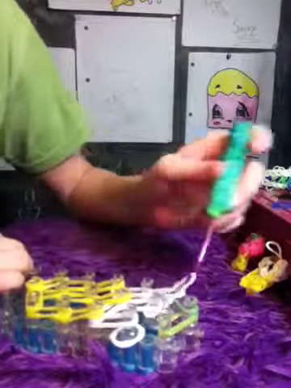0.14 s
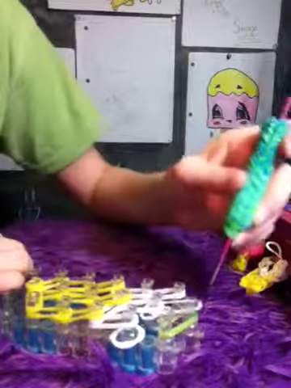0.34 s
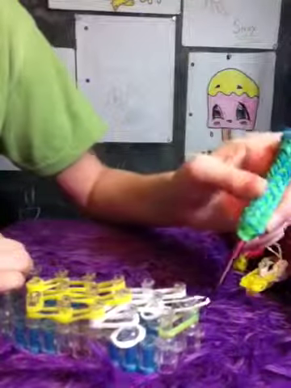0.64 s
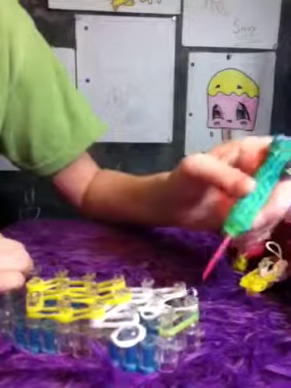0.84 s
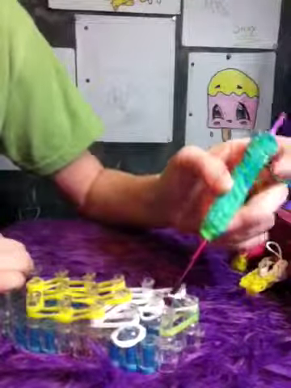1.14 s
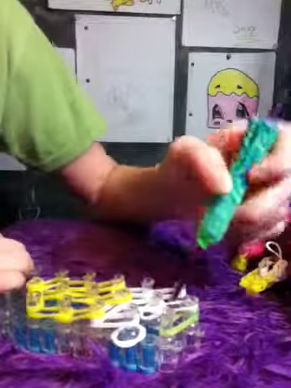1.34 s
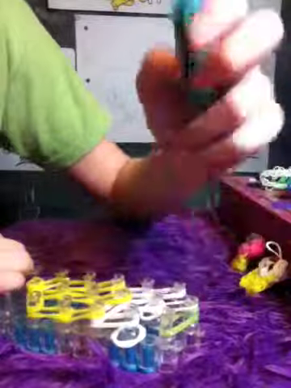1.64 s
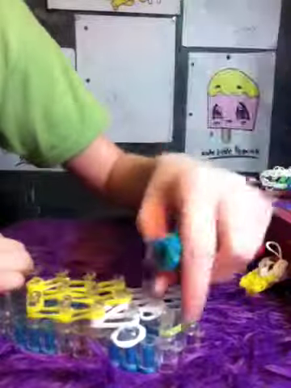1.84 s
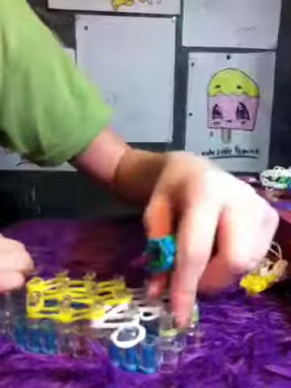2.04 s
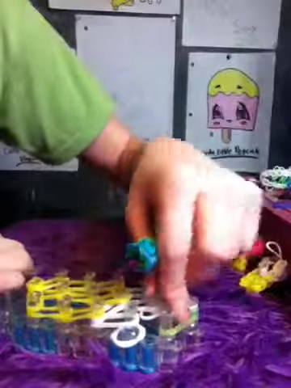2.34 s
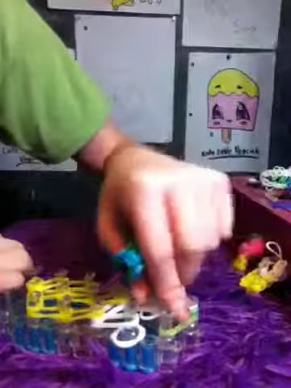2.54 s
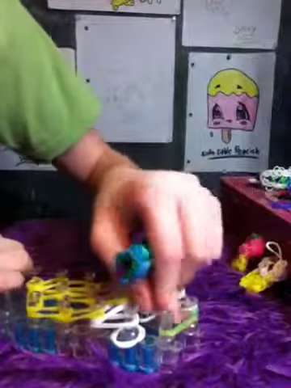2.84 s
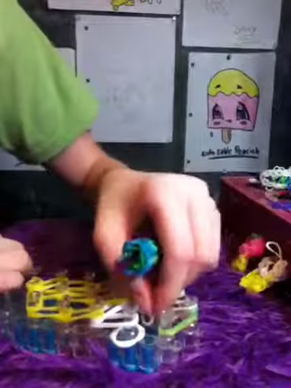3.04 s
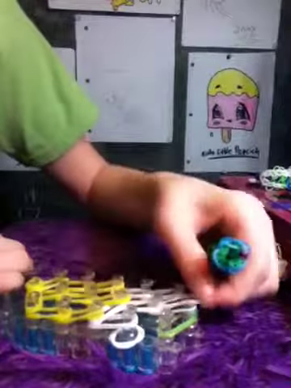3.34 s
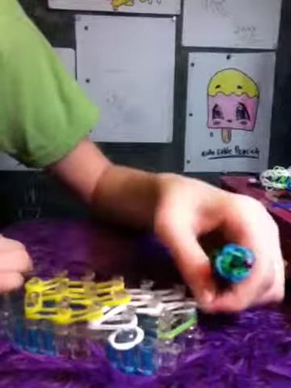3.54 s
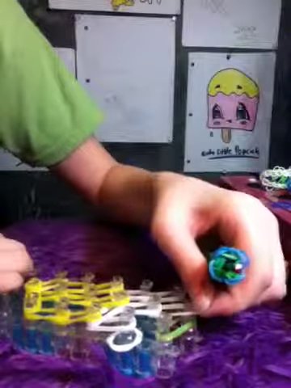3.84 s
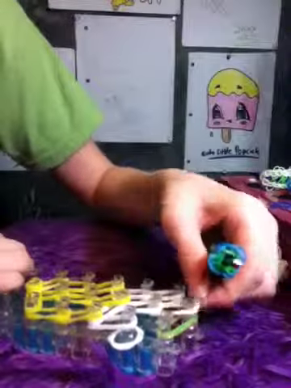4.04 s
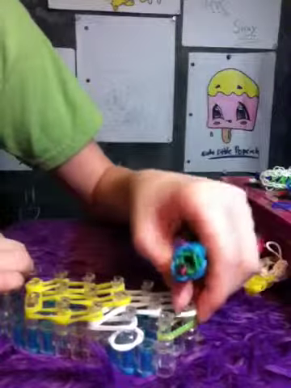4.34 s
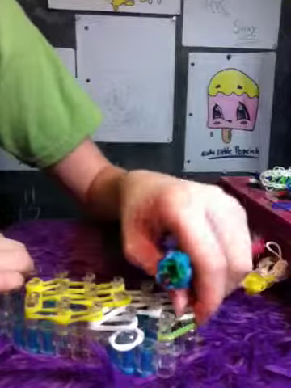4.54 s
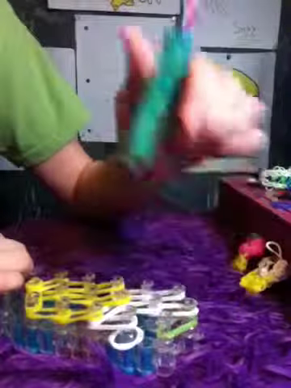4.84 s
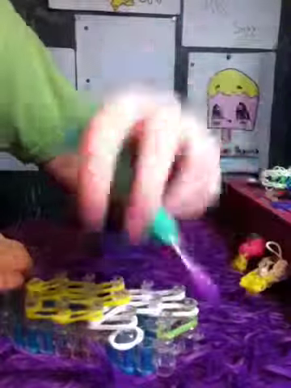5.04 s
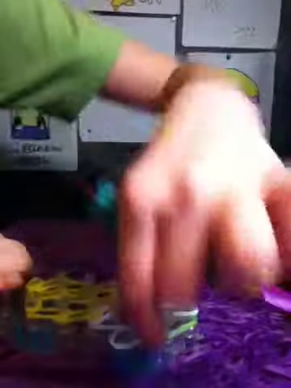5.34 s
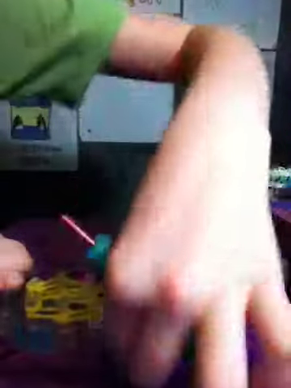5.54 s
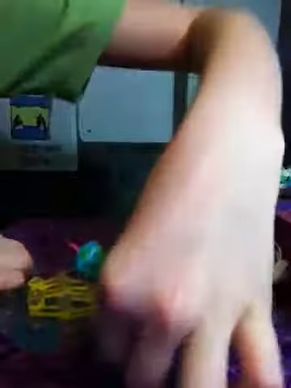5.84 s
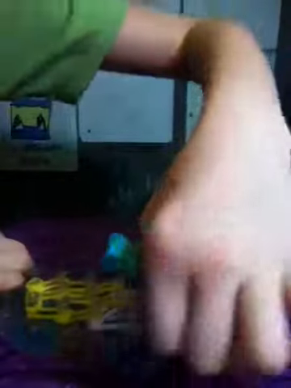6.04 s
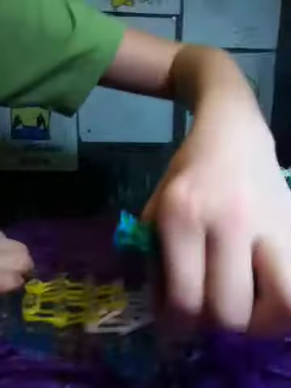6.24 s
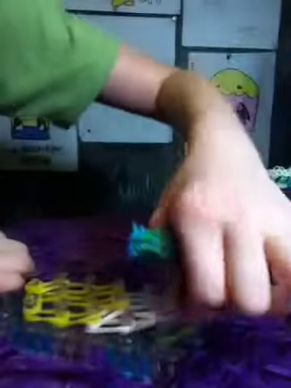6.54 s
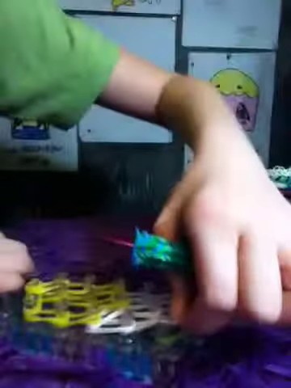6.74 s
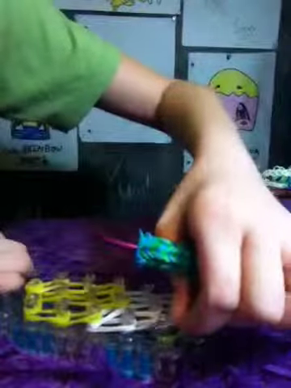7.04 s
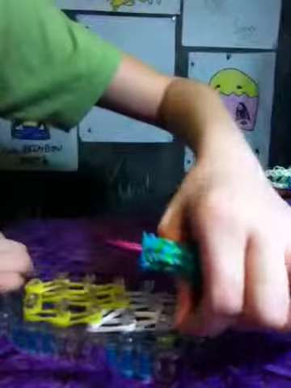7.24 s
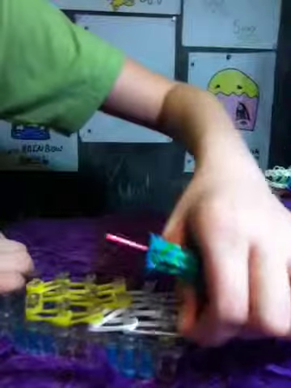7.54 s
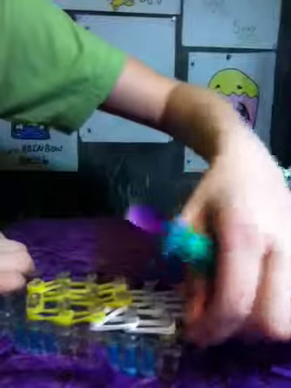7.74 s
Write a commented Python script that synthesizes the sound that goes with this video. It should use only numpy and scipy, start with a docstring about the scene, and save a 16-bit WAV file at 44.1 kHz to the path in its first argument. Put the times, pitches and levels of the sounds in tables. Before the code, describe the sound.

A close microphone in a small dry room picks up rubber bands being hooked over plastic pegs. After a faint rub, isolated clacks come with brief low twangs and soft thumps, separated by quiet fumbling. Past the middle a thin hook clinks brightly, then hollow pops, scrapes and firmer clacks come quicker. Low steady hiss lies underneath throughout.

```python
"""Rubber bands are looped over the pegs of a plastic loom on a furry mat, by plastic hook and fingers, in a small dry room.
Throughout: low steady hiss (shaped noise) and faint stray touches (damped modes).
A soft rub (noisy slips) opens; from 0.7 s bands slip onto pegs with a clack (modes, noise), twang (sine) and thump (modes).
From 5.4 s the hook clinks (bright modes) as it is shifted in the hand; from 6.4 s hollow pops (paired resonances)
and most of the rubs join in. One close microphone."""
import sys
import numpy as np
from scipy import signal
from scipy.fft import rfft, irfft
from scipy.io import wavfile

SR = 44100
rng = np.random.default_rng(int(sys.argv[2]) if len(sys.argv) > 2 else 0)


def transcribe(signal):
    """Save signal, clipped to [-1, 1], as a 16-bit WAV file at the path in sys.argv[1]."""
    frames = np.atleast_2d(signal).T
    limited = np.clip(frames, -1, 1)
    pcm = np.round(limited * 32767).astype(np.int16)
    wavfile.write(sys.argv[1], SR, pcm)


N = 348364
AGE = np.arange(SR // 4) / SR  # time since a blow [s]
HEAD, LONG_HEAD = 660, 1320  # samples over which a blow's level is set: 15 and 30 ms


def undb(db):
    """Decibels to gain."""
    return 10 ** (np.asarray(db) / 20)


def fade(t60_s):
    """Exponential decay that loses 60 dB in t60_s."""
    return np.exp(-np.log(1000) * AGE / t60_s)


def swell(rise_s):
    """Onset of a soft, springy contact."""
    return 1 - np.exp(-AGE / rise_s)


def sine(hz):
    """Steady tone over one blow."""
    return np.sin(2 * np.pi * hz * AGE)


def noise():
    """White noise over one blow."""
    return rng.standard_normal(len(AGE))


def level(x, db, size=None):
    """Scale x so that its first size samples have an rms of db."""
    return x * undb(db) / np.sqrt(np.mean(x[:size] ** 2))


def band(x, lo_hz, hi_hz, order=2):
    """Causal band-pass."""
    sos = signal.butter(order, [lo_hz, hi_hz], "band", fs=SR, output="sos")
    return signal.sosfilt(sos, x)


def add(track, s, sound):
    """Mix a sound into the track at time s."""
    i = int(s * SR)
    track[i:i + len(sound)] += sound[:max(N - i, 0)]


def ring(modes, scatter_db, detune):
    """Damped modes; every point of contact weights and tunes them a little differently."""
    out = np.zeros(len(AGE))
    for hz, db, t60_s in modes:
        weight, tuning = rng.standard_normal(2)
        out += undb(db + scatter_db * weight) * fade(t60_s) * sine(hz * (1 + detune * tuning))
    return out


def chatter(x, size, t60_s):
    """One sharp contact followed by a dying flurry of tiny ones."""
    force = size * noise() ** 3 * fade(t60_s)
    force[0] += 1
    return signal.fftconvolve(force, x)[:len(AGE)]


HISS_DB = -59
# background spectrum: (frequency [Hz], relative density [dB])
HISS_SPECTRUM = [(15, -46), (25, -19), (70, -2), (205, 1), (261, -1), (299, -1.5), (352, -3.5), (414, -4.5),
                 (473, -5.5), (1040, -11.5), (1180, -12), (1930, -14), (4820, -16.5), (14600, -20.5),
                 (15800, -24)]


def hiss():
    """Steady room murmur and microphone hiss: white noise shaped in frequency."""
    hz, db = np.transpose(HISS_SPECTRUM)
    bins_hz = np.maximum(np.fft.rfftfreq(N, 1 / SR), 1)
    gain = undb(np.interp(np.log(bins_hz), np.log(hz), db))
    return level(irfft(rfft(rng.standard_normal(N)) * gain, N), HISS_DB)


ROOM_DB, ROOM_T60_S = -12, 0.15


def room(x):
    """Direct sound and a short, dull tail from the table and the walls."""
    decay = fade(ROOM_T60_S) + 0.83 * fade(0.024)
    tail = band(noise(), 83, 12500, order=1) * decay * swell(0.0015)
    response = undb(ROOM_DB) * tail / np.linalg.norm(tail)
    response[0] += 1
    return signal.fftconvolve(x, response)[:N]


# modes of the loom and its pegs: (nominal frequency [Hz], relative level [dB], undamped-by-hand t60 [s])
LOOM_MODES = [(770, -5.5, 0.075), (916, -4.5, 0.043), (1272, -2, 0.015), (1615, -4, 0.05), (2030, -5, 0.02),
              (2210, -3.5, 0.0035), (2976, -3, .016), (3470, -17, 0.091), (4810, 5.5, 0.031),
              (5470, 7.5, 0.022), (6320, -1, 0.063), (6970, 2, 0.0072), (10630, 7, 0.024)]


def loom(scatter_db, detune):
    """The hard plastic of loom and pegs rings in many modes."""
    return ring(LOOM_MODES, scatter_db, detune)


# the loom rocking on the mat: (nominal frequency [Hz], relative level [dB], t60 [s])
BASE_MODES = [(187.6, -10.5, 0.056), (218, -8.5, 0.056), (308, 6.5, 0.03)]


def base(scatter_db, detune):
    """The whole loom rocks on the mat in a few low modes."""
    return ring(BASE_MODES, scatter_db, detune)


TOUCHES = 24
TOUCH_DB, TOUCH_RANGE_DB = -71.5, 6.5  # softest touch, span up to the firmest
BAND_HZ, BAND_T60_S = 460, 0.082  # mean pitch of a band brushed in passing, its decay
TOUCH_TWANG_DB = 2  # twang against touch, at full force


def handling():
    """Faint stray touches of fingers on rubber and plastic; a firmer touch twangs the band more."""
    out = np.zeros(N)
    for when, force, stretch in rng.random((TOUCHES, 3)):
        s = when * N / SR
        db = TOUCH_DB + TOUCH_RANGE_DB * force
        touch = band(loom(scatter_db=5.5, detune=0.054), 640, 3500)
        touch = touch + 0.5 * base(scatter_db=5, detune=0.13)
        add(out, s, level(touch * swell(0.0012), db, HEAD))
        pitch_hz = BAND_HZ * (1 + 0.2 * (stretch - 0.5))
        twang = sine(pitch_hz) * fade(BAND_T60_S) * swell(0.0053)
        add(out, s, force * level(twang, db + TOUCH_TWANG_DB, LONG_HEAD))
    return out


RUB_RISE, RUB_WIDTH_OCT = 0.6, 1.29  # share of the length spent building up, 0-1; resonance width
SLIPS_PER_S, SLIP_FLOOR = 1900, 0.027  # rate of full slips, constant fine friction under them
# soft rasps and rubs: (time of peak [s], length: rise + fall sigma [s], peak level [dB], resonance centre [Hz])
RUBS = [(0.122, .12, -67, 1310), (4.736, 0.063, -63, 890), (6, 0.18, -68, 1680), (6.487, 0.025, -46.5, 850),
        (6.559, 0.0092, -35, 595), (6.686, 0.026, -50.5, 600), (7.247, 0.066, -56.5, 120),
        (7.345, 0.046, -56, 1220), (7.48, 0.068, -62.5, 1970), (7.62, 0.036, -50, 1300),
        (7.653, 0.037, -47.5, 1640), (7.846, 0.026, -41, 1600)]


def rasps():
    """Dense, uneven slips; each rub builds slowly, lets go faster and has its own broad resonance."""
    out, t = np.zeros(N), np.arange(N) / SR
    edge = 2 ** (RUB_WIDTH_OCT / 2)
    for s, length_s, db, hz in RUBS:
        sigma_s = length_s * np.where(t < s, RUB_RISE, 1 - RUB_RISE)
        pressure = np.exp(-0.5 * ((t - s) / sigma_s) ** 2)
        full_slip = rng.random(N) < SLIPS_PER_S / SR
        slips = rng.uniform(-0.76, 1, N) * (full_slip + SLIP_FLOOR)
        out += pressure * level(band(slips, hz / edge, hz * edge, order=3), db)
    return out


# low ring under every pop: (nominal frequency [Hz], relative level [dB], t60 [s])
POP_BODY_MODES = [(223, -13.5, 0.08), (343, -9.5, 0.049), (545, -11, 0.036)]


def pop_body():
    """Low damped modes set off by a pop."""
    return ring(POP_BODY_MODES, scatter_db=2, detune=0.047)


POP_TICK_DB, POP_TICK_DB_PER_OCT = -17.5, 22  # tick against pop at upper resonance 1600 Hz; higher is crisper
# hollow pops: (time [s], level [dB], lower resonance [Hz], upper resonance [Hz], resonance t60 [s],
#   thump frequency [Hz], thump level [dB])
POP_EVENTS = [(6.465, -39, 730, 990, .015, 232, -42), (6.555, -31.5, 686, 1610, .009, 415, -34),
              (6.6579, -43.5, 900, 1730, 0.0026, 283, -36.5), (6.697, -29, 1200, 1580, 0.0081, 450, -39),
              (7.5073, -28, 1186, 1890, 0.0091, 302, -46.5), (7.839, -48, 1340, 1980, .008, 400, -66),
              (7.8481, -45, 1313, 1870, 0.014, 400, -64), (7.896, -32, 1355, 1690, 0.012, 420, -45)]


def pops():
    """A sudden release cracks and rings two broad, hollow resonances over a low thump."""
    out = np.zeros(N)
    for s, db, lower_hz, upper_hz, t60_s, thump_hz, thump_db in POP_EVENTS:
        hollow = (sine(lower_hz) - undb(-0.4) * sine(upper_hz)) * fade(t60_s)
        hollow = chatter(hollow, size=0.002, t60_s=0.017)
        add(out, s, level(band(hollow, 770, 4800), db, HEAD))
        tick = band(noise() * fade(0.0098), 1600, 4640)
        tick_db = db + POP_TICK_DB + POP_TICK_DB_PER_OCT * np.log2(upper_hz / 1600)
        add(out, s, level(tick, tick_db, HEAD))
        thump = sine(thump_hz) * fade(0.028) + pop_body()
        add(out, s, level(thump * swell(0.011), thump_db, HEAD))
    return out


# modes of the hook: (frequency [Hz], relative level [dB], t60 before grip damping [s])
HOOK_MODES = [(3500, 1.5, 0.042), (4600, -5, 0.085), (5180, 5.5, 0.074), (5870, -0.5, 0.071),
              (5940, -17, 0.065), (6940, -7, .08), (6820, -6, 0.055), (6900, 5.5, 0.061), (8200, 3, .06),
              (10140, -0.5, 0.11), (10700, -7, .06), (13540, -3, .07)]


def hook(centre_hz, slope_db_per_oct):
    """The hook's modes, weaker away from the one frequency that the grip favours."""
    tone = np.zeros(len(AGE))
    for hz, mode_db, t60_s in HOOK_MODES:
        loss_db = slope_db_per_oct * abs(np.log2(hz / centre_hz))
        tone += undb(mode_db - loss_db) * fade(t60_s) * sine(hz)
    return tone


# clinks of the hook: (time [s], level [dB], favoured frequency [Hz], fall away from it [dB/octave],
#   share free of grip damping [0-1])
CLINK_EVENTS = [(5.4527, -44, 6900, 5, 0), (5.5414, -41.5, 6000, 0, 0.22), (6.6207, -62, 5800, 40, .15),
                (7.7495, -39, 5900, 76, 0.3)]


def clinks():
    """The hook rattles and rings brightly; the grip soon damps it."""
    out = np.zeros(N)
    for s, db, centre_hz, slope_db_per_oct, free in CLINK_EVENTS:
        damping = free + (1 - free) * fade(0.052)
        tone = hook(centre_hz, slope_db_per_oct)
        rattle = band(noise(), 4000, 9200) * fade(0.24)
        add(out, s, level(tone * damping, db, HEAD))
        add(out, s, level(rattle * damping, db - 10.5, HEAD))
    return out


GRIP_T60_S = 0.028  # hand on the loom and taut bands damp its modes
PEG_RING_GAIN, PEG_RING_OCT = 2.03, 0.2  # struck peg's resonance: gain, width


def clack(peg_hz):
    """Loom modes under chatter, plus the dense crack of many loose pegs; the struck peg rings out."""
    modes = loom(scatter_db=6.0, detune=0.041) * fade(GRIP_T60_S)
    crack = noise() * (2.24 * fade(0.014) + 0.18 * fade(0.11))  # the second term is a faint rattle
    plastic = (chatter(modes, size=0.012, t60_s=0.0086) + crack) * swell(0.0003)
    edge = 2 ** (PEG_RING_OCT / 2)
    return plastic + PEG_RING_GAIN * band(plastic, peg_hz / edge, peg_hz * edge, order=1)


KNOCK_DB, MIDDLE_DB, TICK_DB = -3.5, -1.9, -2.5  # frame, middle and edge vibration against snap strength
TICK_TOP_HZ, TICK_OCT_PER_DB = 9240, 0.05  # a harder contact reaches higher
PEG_DB, PEG_WIDTH_OCT = 4.5, 0.72  # lift of the part nearest the peg's ring
# bands and hook meeting the pegs: (time [s], strength [dB], contact hardness [dB], peg ring [Hz],
#   band pitch [Hz], twang level [dB], twang t60 [s], thump level [dB])
SNAP_EVENTS = [(.7096, -43.5, -1.5, 1290, 503, -42, 0.028, -47.5),
               (0.8288, -67, -6.5, 915, 479, -60.5, .12, -74),
               (.962, -45, 1.5, 1910, 452, -44.5, 0.041, -50.5),
               (1.327, -45.5, -3.5, 2070, 284, -47.5, 0.034, -54),
               (1.469, -73, -3, 770, 410, -58, 0.11, -59), (1.5134, -54, 2.5, 2110, 443, -52, 0.027, -51),
               (2.729, -68.5, -2, 2050, 457, -60.5, 0.046, -72),
               (2.8502, -64, -1, 2040, 400, -62.5, 0.025, -74),
               (3.0143, -48.5, -5, 2200, 482, -41.5, .094, -47),
               (3.22, -65.5, -4, 2100, 460, -53, 0.043, -53.5),
               (3.3912, -55, -5, 764, 494, -55.5, .04, -72), (3.7564, -44.5, 1, 7050, 500, -38.5, .11, -48),
               (4.026, -73, -2, 770, 500, -59, .043, -69),
               (4.1085, -38, -1.5, 5400, 452, -41.5, 0.043, -54.5),
               (4.602, -62.5, -3, 770, 480, -66, 0.033, -59.5),
               (4.6912, -61, 2, 7000, 450, -63.5, 0.035, -64),
               (5.052, -61.5, -3, 1570, 400, -72, 0.037, -67), (5.22, -62, 5, 2960, 405, -79, .03, -80),
               (5.3524, -56, 1, 865, 480, -77, .03, -72), (5.453, -53, -1.5, 4750, 505, -66, 0.018, -75),
               (5.478, -68, -2, 770, 276, -47, 0.031, -52), (5.541, -53, 9.5, 5100, 520, -65, .02, -64),
               (6.027, -47, -0.5, 10300, 497, -59, 0.037, -56),
               (6.0471, -64, 1, 3000, 473, -60, 0.16, -51.5),
               (6.2634, -61, -5, 2150, 422, -54.5, 0.019, -50),
               (6.304, -62.5, -6, 775, 160, -53, 0.058, -59), (6.6204, -59.5, 0, 3000, 400, -75, .02, -72),
               (6.9699, -41, -1, 910, 484, -55, .048, -47.5),
               (7.049, -68.5, -9.5, 1310, 408, -75, .02, -67),
               (7.193, -63.5, -9, 760, 224, -47.5, 0.14, -55),
               (7.3558, -43.5, -2, 1260, 471, -55.5, 0.082, -48),
               (7.7305, -44.5, 2, 3020, 464, -45.5, 0.032, -69),
               (7.748, -38.5, 1.5, 3130, 473, -46, .045, -48.5)]


def snaps():
    """A band drags over a peg and slips: the plastic clacks, the stretched rubber twangs, the loom rocks."""
    out = np.zeros(N)
    for s, db, hard_db, peg_hz, band_hz, twang_db, twang_t60_s, thump_db in SNAP_EVENTS:
        plastic = clack(peg_hz)
        # hardness shifts the balance from frame to edge vibration
        top_hz = TICK_TOP_HZ * 2 ** (TICK_OCT_PER_DB * hard_db)
        parts = ((690, 1940, KNOCK_DB - hard_db),
                 (1545, 3220, MIDDLE_DB),
                 (4600, top_hz, TICK_DB + hard_db))
        for lo_hz, hi_hz, part_db in parts:
            distance_oct = np.log2(np.sqrt(lo_hz * hi_hz) / peg_hz)
            nearness = np.exp(-(distance_oct / PEG_WIDTH_OCT) ** 2)
            part = band(plastic, lo_hz, hi_hz)
            add(out, s, level(part, db + part_db + PEG_DB * nearness, HEAD))
        # reversed decay: friction builds just before the slip
        drag = band(noise(), 980, 3200, order=1) * fade(0.0045)
        add(out, s - len(AGE) / SR, level(drag, db - 10.5, HEAD)[::-1])
        twang = sine(band_hz) * fade(twang_t60_s) * swell(0.0051)
        add(out, s, level(twang, twang_db, LONG_HEAD))
        rocking = base(scatter_db=2, detune=0.05) * swell(0.0095)
        add(out, s, level(rocking, thump_db, LONG_HEAD))
    return out


def scene():
    """All sounds reach one microphone, alike in both channels."""
    contacts = handling() + rasps() + pops() + clinks() + snaps()
    mono = hiss() + room(contacts)
    return np.array([mono, mono])


TOP_HZ = 15850


def record(dry):
    """The recorder cuts the top steeply."""
    return signal.sosfilt(signal.ellip(10, 0.2, 70, TOP_HZ, fs=SR, output="sos"), dry)


dry = scene()
out = record(dry)
transcribe(out)
```